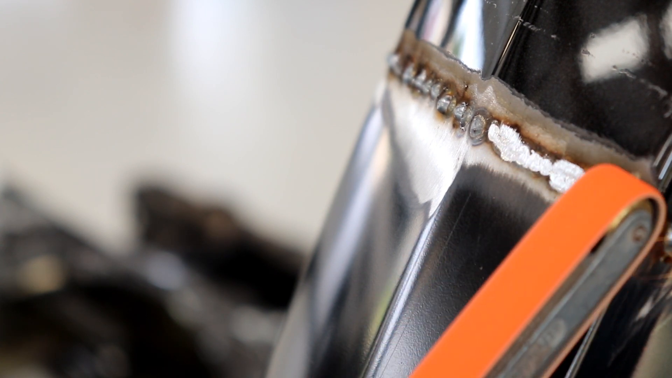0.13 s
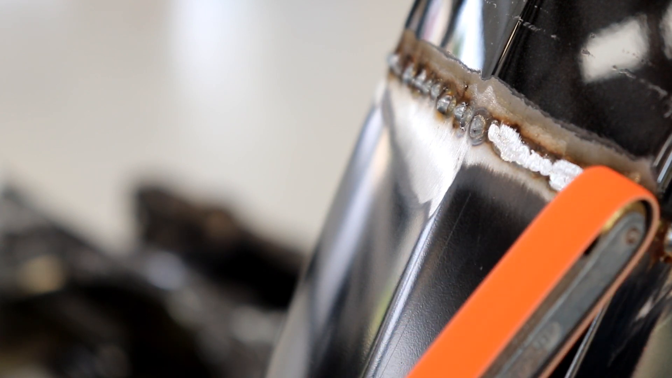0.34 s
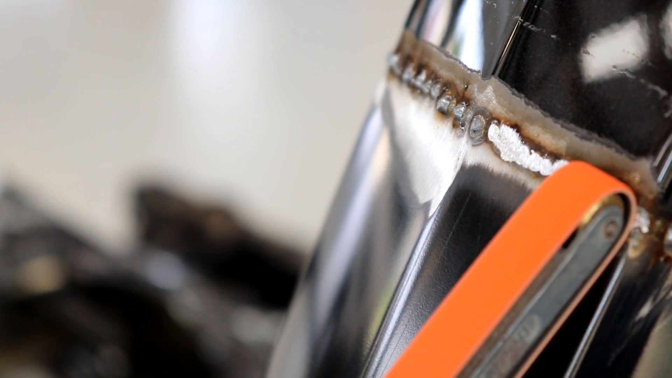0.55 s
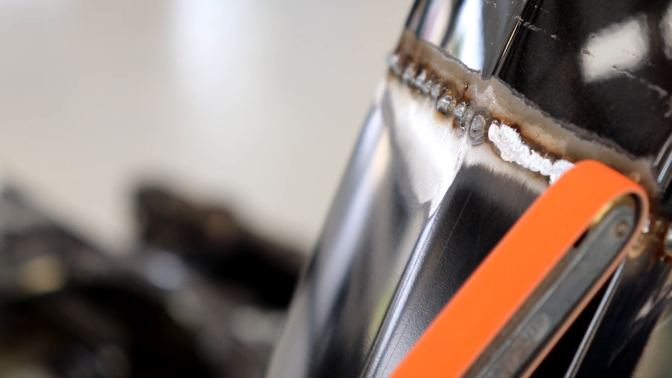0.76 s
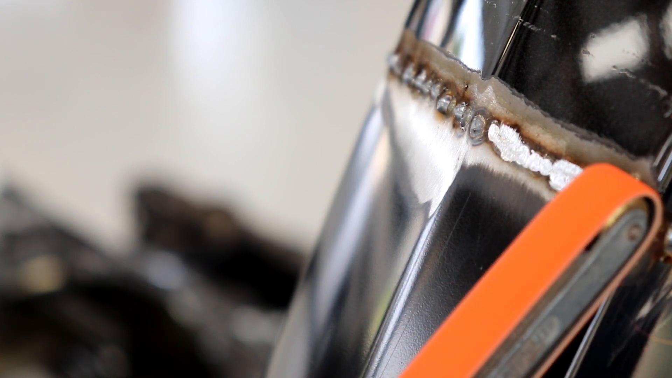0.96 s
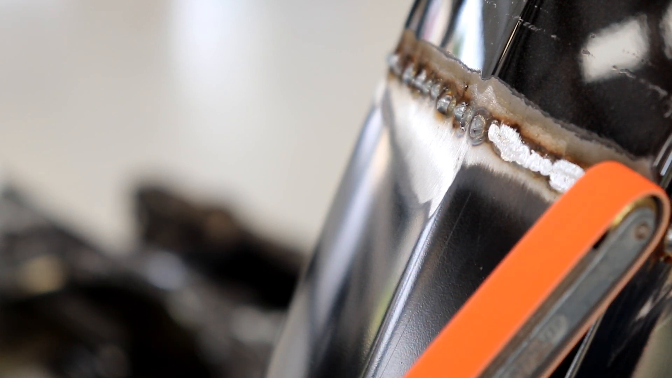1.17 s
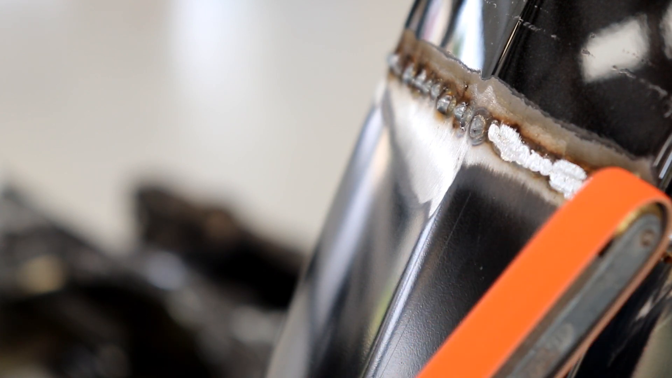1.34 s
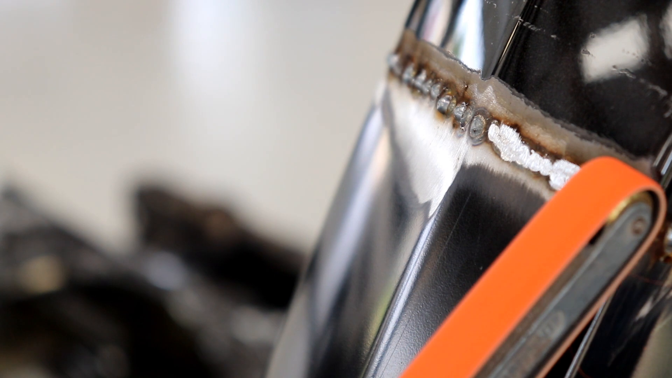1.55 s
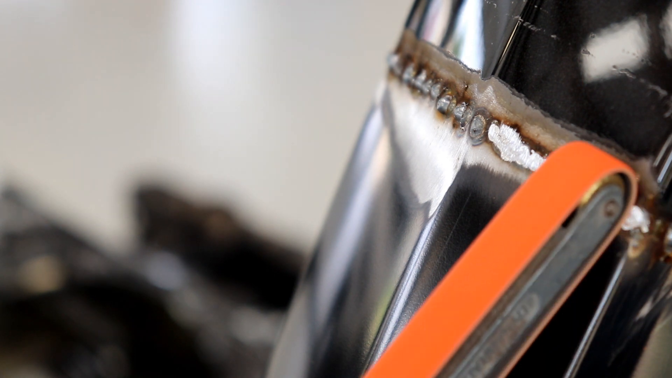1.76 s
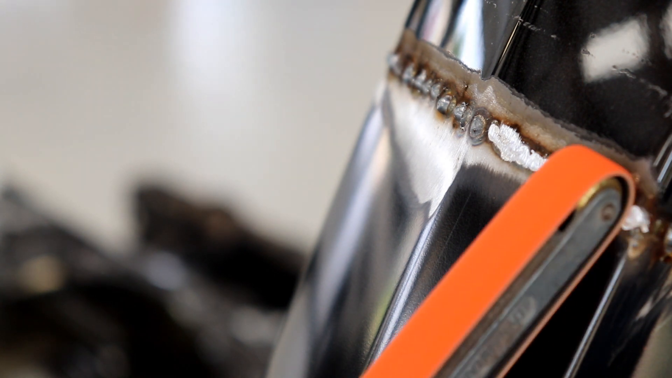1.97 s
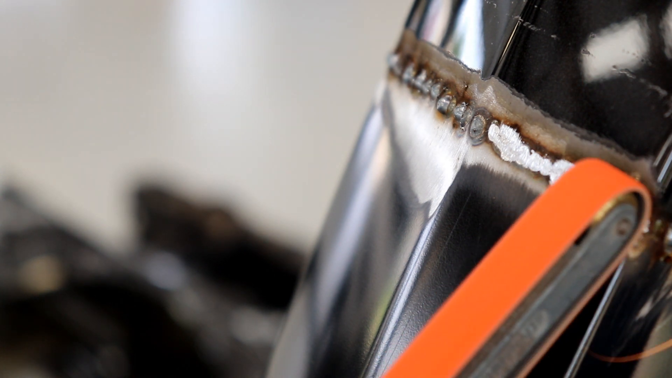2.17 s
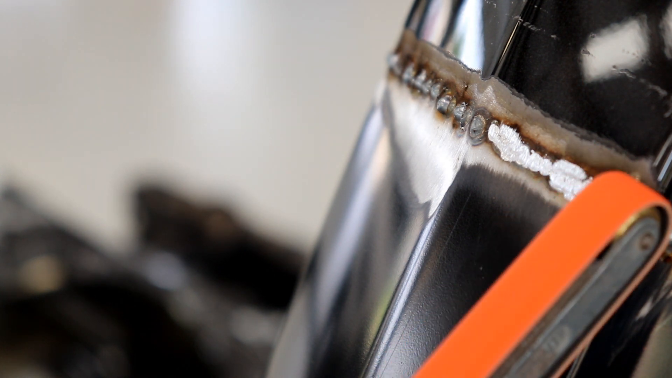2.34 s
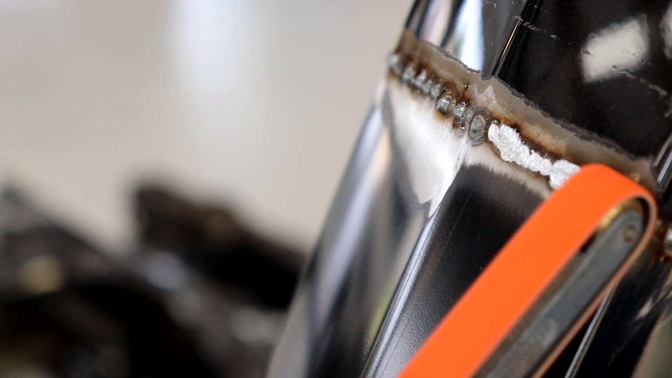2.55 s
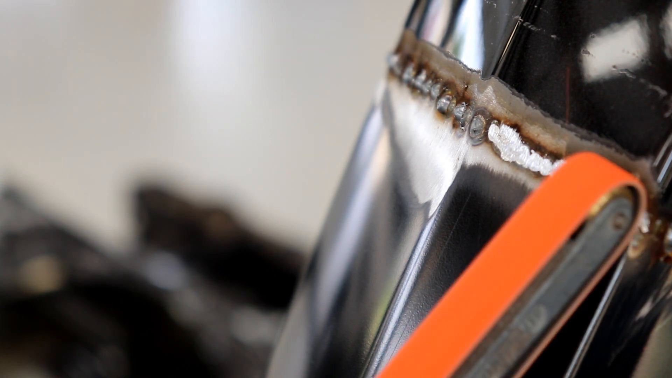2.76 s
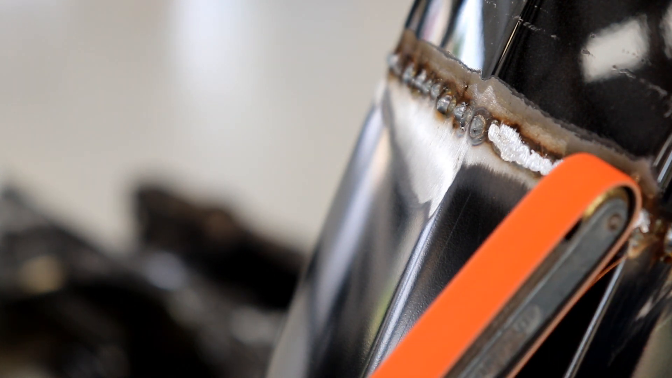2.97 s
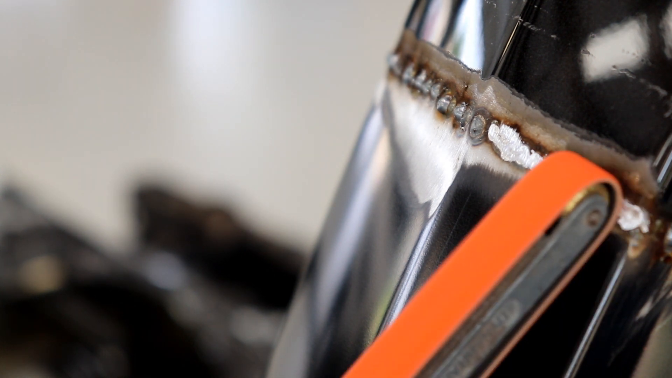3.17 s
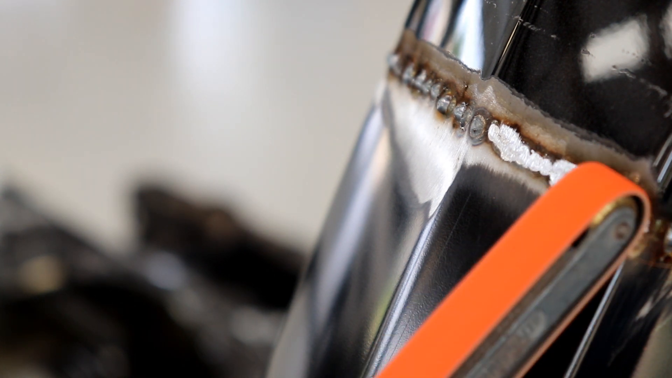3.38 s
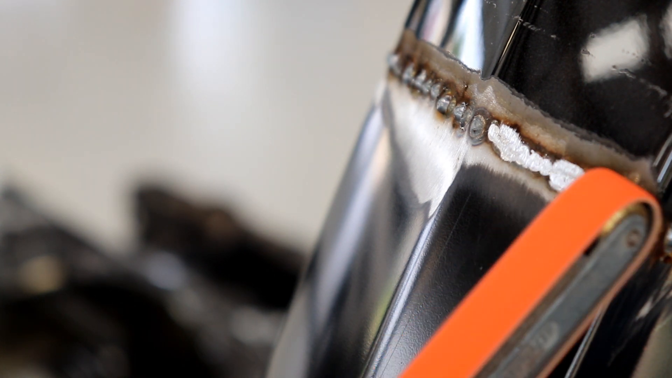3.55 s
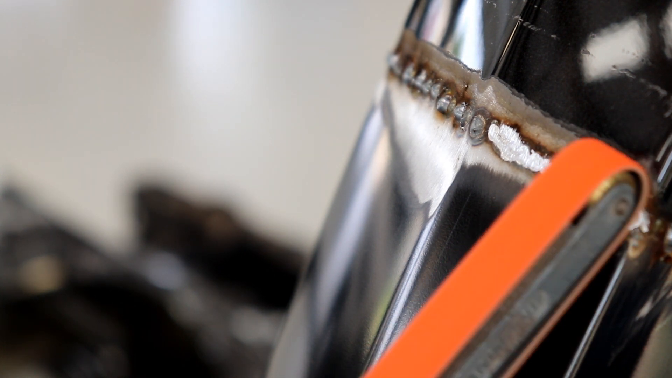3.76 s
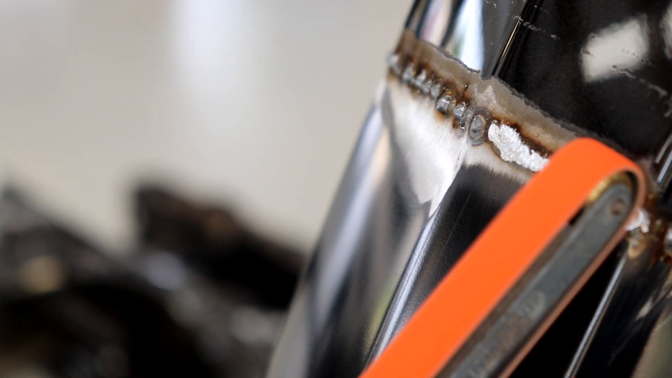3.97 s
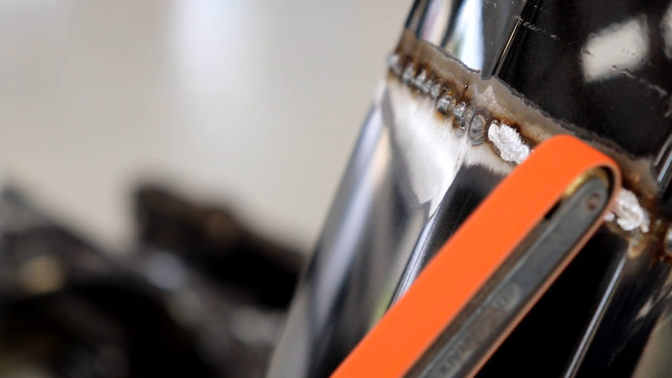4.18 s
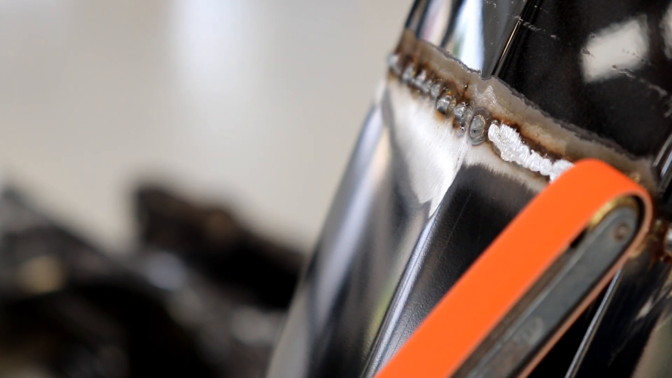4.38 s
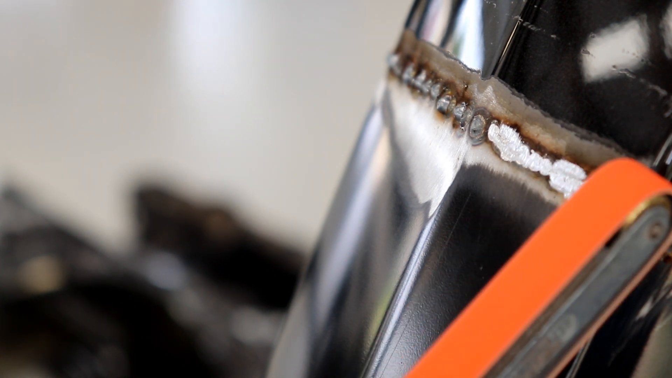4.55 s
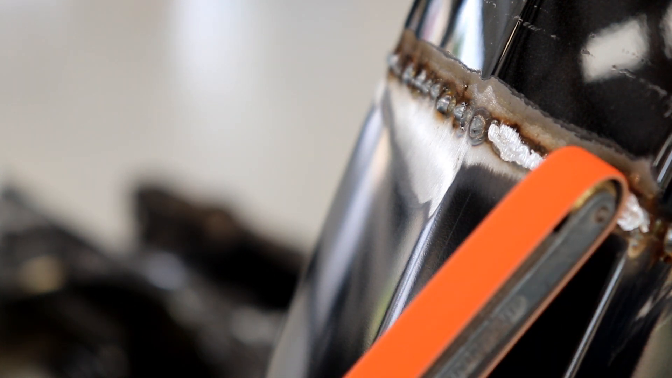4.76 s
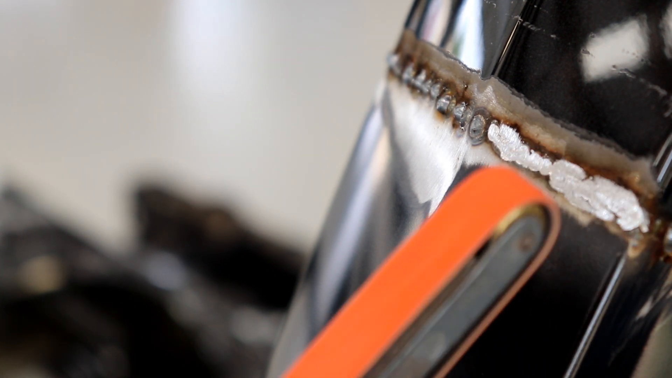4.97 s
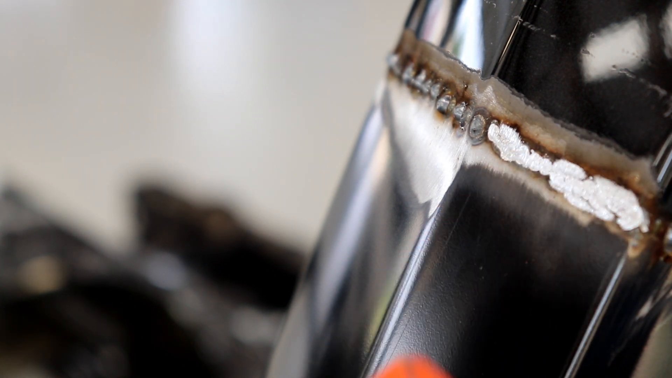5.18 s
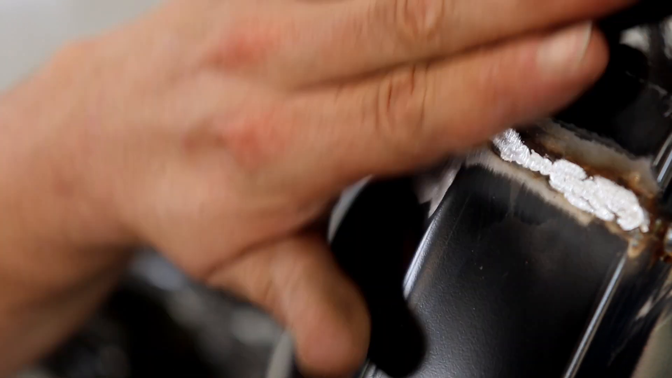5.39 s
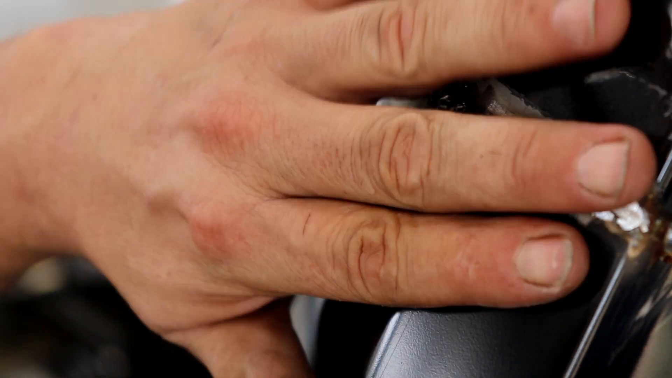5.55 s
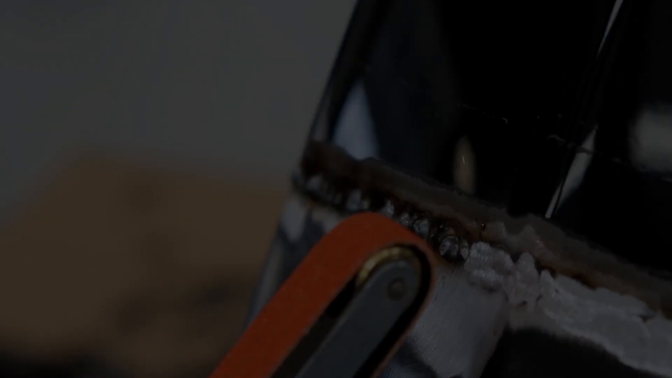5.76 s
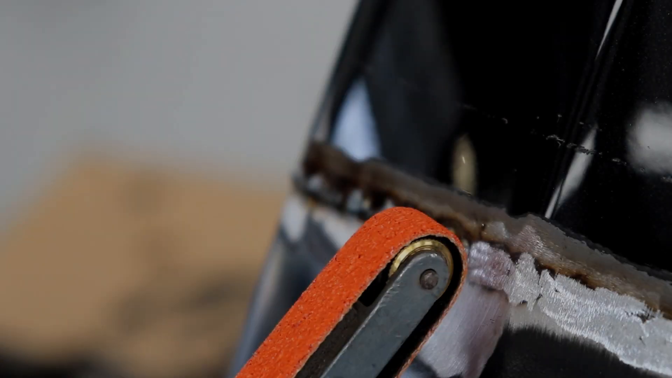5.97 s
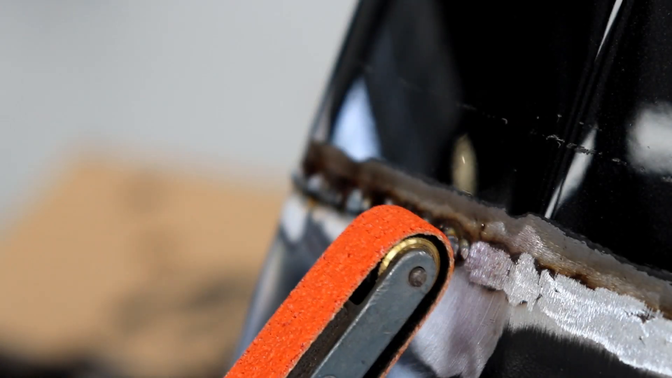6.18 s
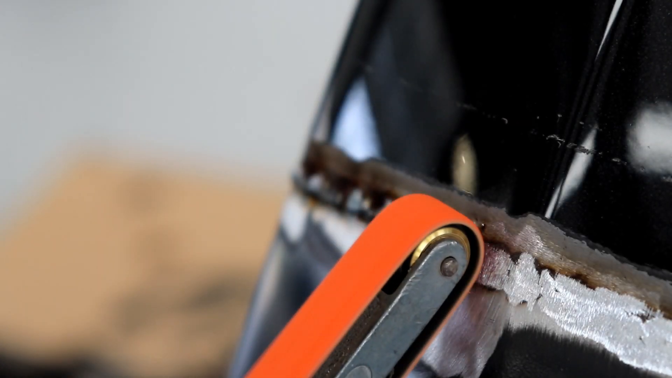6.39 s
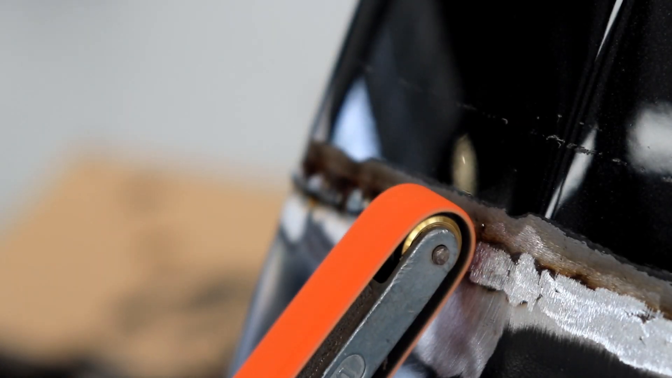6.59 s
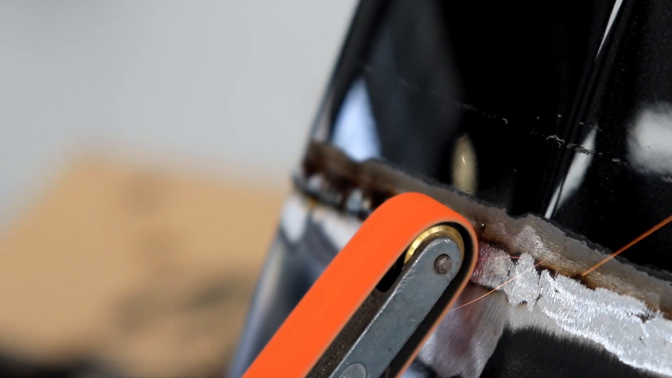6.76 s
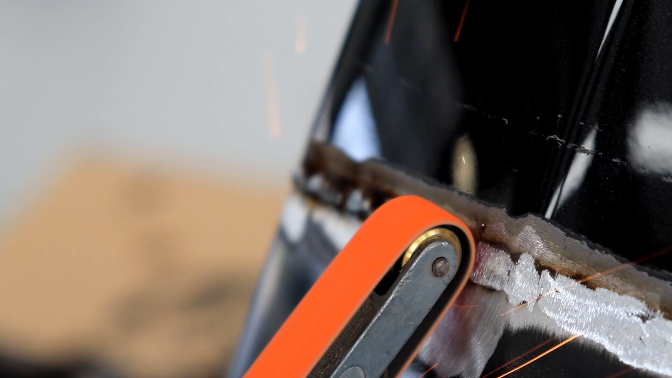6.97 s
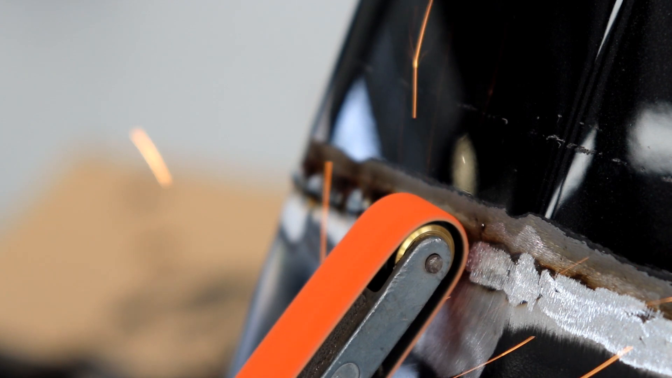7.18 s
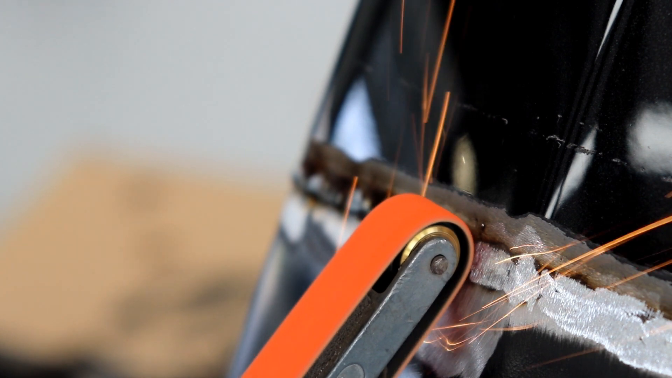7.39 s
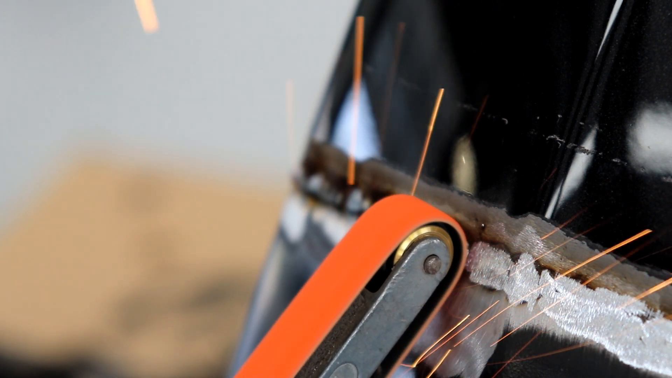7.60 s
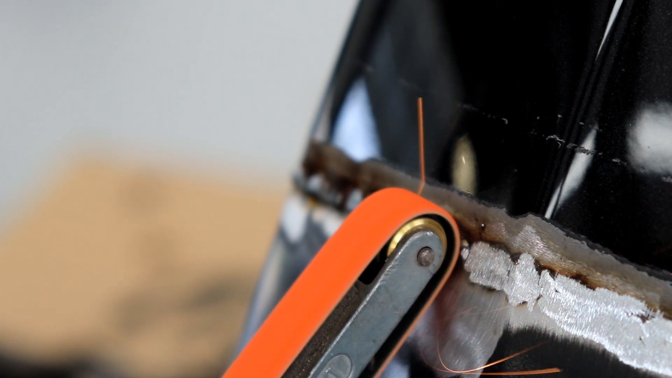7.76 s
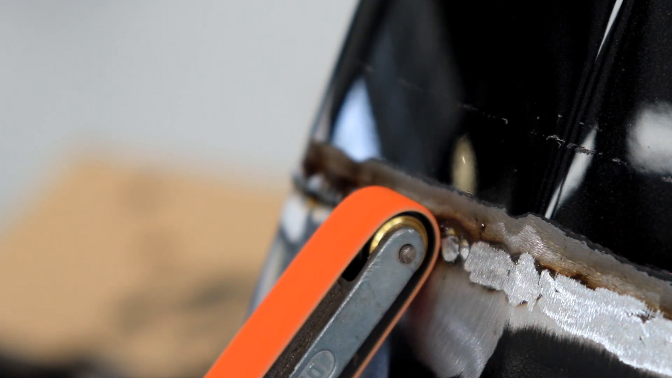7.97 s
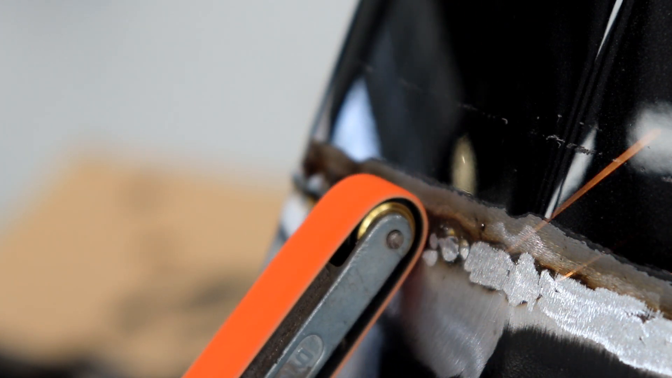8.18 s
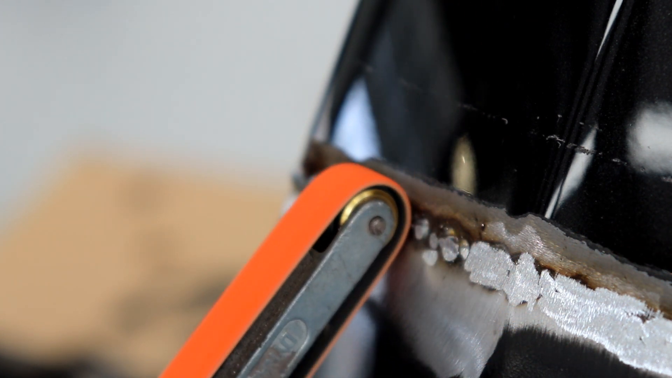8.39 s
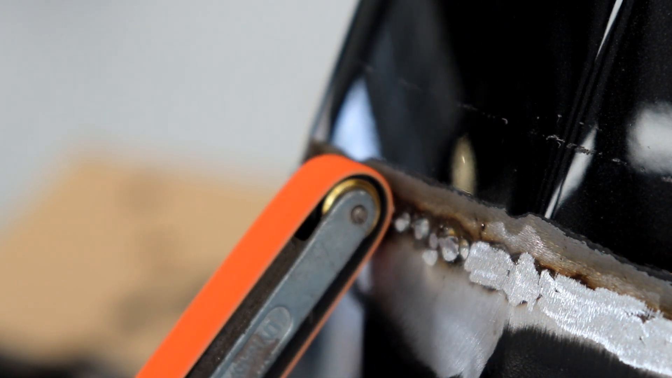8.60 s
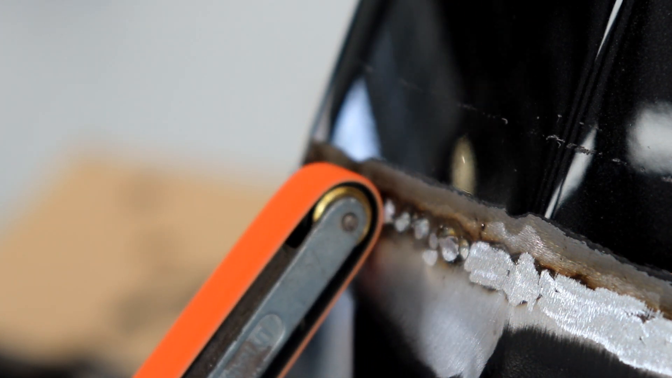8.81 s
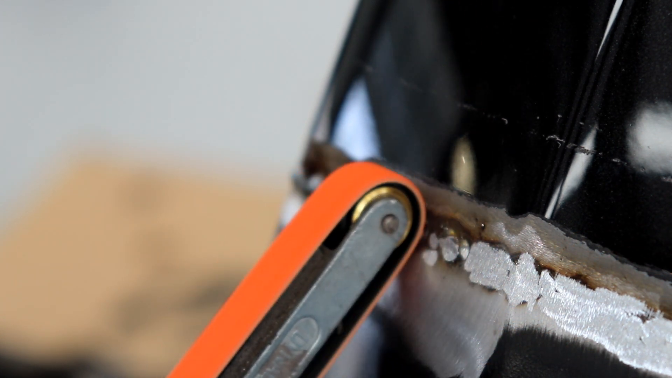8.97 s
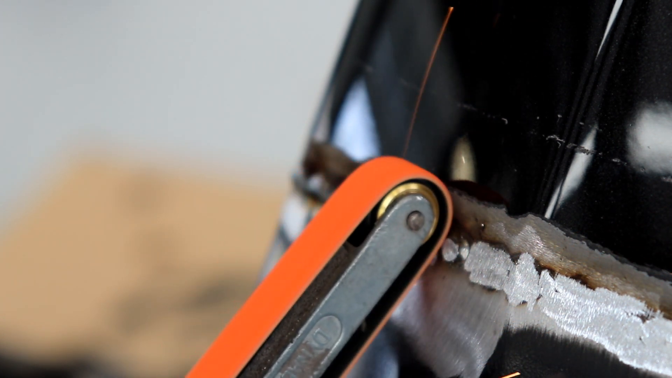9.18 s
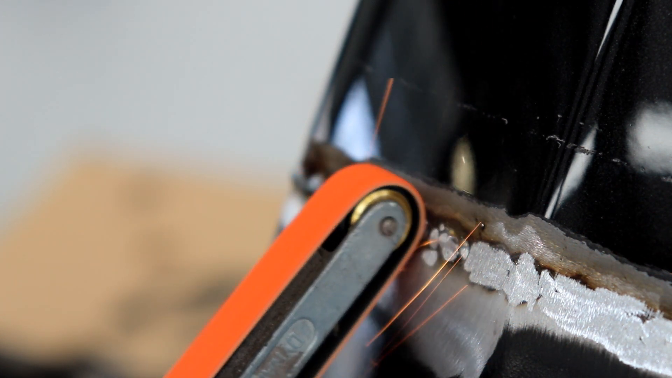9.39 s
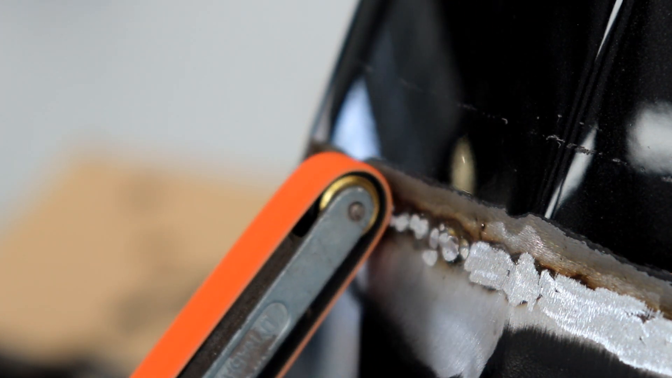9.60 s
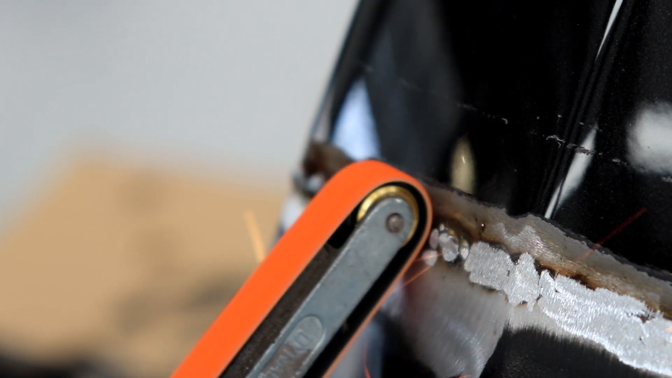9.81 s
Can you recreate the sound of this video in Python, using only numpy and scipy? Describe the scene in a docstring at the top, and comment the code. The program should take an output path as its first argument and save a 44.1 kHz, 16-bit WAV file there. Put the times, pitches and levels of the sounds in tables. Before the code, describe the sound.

A handheld pneumatic sander presses a fast abrasive belt on thin welded metal: dense harsh rasp, high jet hiss, wavering whine and faint hum. After about five seconds it cuts out with a loud, swiftly falling exhaust note. In the quieter gap, hand and tool brush the panel over a distant drone, and the motor blips. Then it putters, climbs to a whistle and grinds a second spot until the end. Close mono microphone.

```python
"""In a body shop, an air-driven belt sander grinds a weld on a thin steel panel, heard close and in mono.
It lifts off and coasts down, gives one short kick, then spins up and bites in again at a second spot.
Grit noise repeating with the belt laps drives the panel; whines and hum are multiples of the drive speed.
Exhaust pulses are sums of harmonics that fall to a putter at each stop and climb again on the restart.
Air jet, leak, scuffs and the drone of the shop are noise shaped in spectrum and level."""
import sys
import numpy as np
from scipy import signal
from scipy.fft import rfft, irfft, next_fast_len
from scipy.io import wavfile
from scipy.ndimage import uniform_filter1d

SR = 44100
rng = np.random.default_rng(int(sys.argv[2]) if len(sys.argv) > 2 else 0)


def persist_wave(psi):
    """Save psi, clipped to +-1, as 16-bit WAV."""
    counts = np.round(np.clip(psi, -1, 1) * 32767).astype(np.int16)
    wavfile.write(sys.argv[1], SR, np.atleast_2d(counts).T)


N = 433926
TIME = np.arange(N) / SR  # s

# Mean drive speed in the two passes, sagging as the belt is pressed on: t/s, speed/(turns/s)
DRIVE_SPEED_1 = [(0.0, 288.0), (0.18, 287.8), (0.34, 279.1), (0.78, 285.3), (1.34, 281.7), (1.7, 286.6),
                 (1.8, 283.1), (2.28, 287.5), (2.48, 283.9), (2.9, 286.9), (3.04, 284.2), (3.24, 287.2),
                 (3.8, 289.1), (4.26, 287.1), (4.42, 297.2), (4.76, 297.4), (4.82, 291.7), (4.9, 295.1)]
DRIVE_SPEED_2 = [(6.84, 270.8), (7.08, 274.1), (7.2, 285.4), (7.3, 287.9), (7.76, 280.6), (8.26, 293.9),
                 (8.4, 290.6), (8.98, 289.6), (9.12, 285.7), (9.62, 282.9), (9.82, 284.1)]
WORKING_SPEED, SPEED_SWING = 285, 13  # turns/s
PULSES_PER_TURN, LAPS_PER_TURN = 4.36, .154  # exhaust pulses and belt laps

# Relative spectrum of the rasp at each spot: f/Hz, level/dB
RASP_SPECTRUM_1 = [(60, -39), (150, -32), (300, -16.5), (520, -10.5), (850, 0.5), (1150, -5), (1850, -6),
                   (2150, -4.5), (2500, 3), (2950, 1), (3300, -2), (4000, -0.5), (5200, -2), (9000, -19.5)]
RASP_SPECTRUM_2 = [(60, -29), (200, -41), (300, -14.5), (500, -11), (700, -2.5), (980, 0), (1200, -4),
                   (2100, -1), (2300, -1), (3000, -0.5), (3400, 2), (4100, -2.5), (5200, -2.5),
                   (9000, -15.5)]
# Relative spectrum of the air jet in each pose: f/Hz, level/dB
JET_SPECTRUM_1 = [(2500, -25.5), (4300, -12), (5300, 4), (6100, 0.5), (6500, -4), (7200, -1), (8800, 1.5),
                  (9800, -0.5), (10500, -6.5), (11200, -2), (12400, -6), (14200, -3), (14700, -7.5),
                  (16000, -14)]
JET_SPECTRUM_2 = [(2500, -38), (4300, -13), (5300, 3), (6300, -4), (7000, 1), (7600, 1), (8700, 5),
                  (9800, 2.5), (10300, -4), (12000, -3), (14000, -5), (16000, -2)]

# Whines as multiples of drive speed: the exhaust beat, then four gear-like tones
WHINE_ORDERS = [4.36, 6, 12, 18, 30]
# The five whines in each pass: mean level at working speed/dB, slope/(dB per turn/s), flutter (0-1)
WHINES_1 = [(-35.3, -0.06, 0.24), (-34.5, -0.3, 0.4), (-36.5, -0.03, 0.3), (-26, 0.34, 0.18),
            (-38, -0.1, .2)]
WHINES_2 = [(-33.5, 0.054, .22), (-31.5, -0.052, 0.23), (-28, -0.022, 0.61), (-31.5, .4, 0.31),
            (-32.5, 0.15, 0.29)]
# Weak tones of bearings and belt rollers:
# multiple of drive speed, relative level in first pass/dB, relative level in second pass/dB
BEARING_TONES = [(1.06, -60, -46.5), (2.0, -47, -50), (2.44, -50, -44), (3.33, -49, -40), (3.52, -42, -41),
                 (3.73, -41, -42), (4.0, -44, -60), (4.98, -41, -40), (5.36, -43, -44), (6.94, -47, -40),
                 (7.25, -60, -40), (7.41, -48, -39), (7.55, -51, -41), (7.7, -47, -42), (8.0, -37, -48),
                 (8.09, -38, -49), (8.36, -40, -40), (8.72, -37, -35), (9.0, -41, -52), (9.34, -37, -38),
                 (9.72, -39, -40), (10.88, -48, -42), (11.02, -47, -42), (13.0, -44, -50),
                 (13.14, -60, -40), (13.44, -60, -40), (14.0, -45, -48), (14.8, -49, -44), (15.1, -56, -42),
                 (17.0, -42, -48), (20.0, -40, -60), (24.0, -34, -42), (25.0, -48, -44), (26.0, -45, -52),
                 (28.0, -42, -47), (32.0, -44, -48), (36.0, -49, -47)]

HUM_ORDER = 1.387  # belt hum as a multiple of drive speed
# Relative level of the belt hum in the two passes: t/s, level/dB
HUM_LEVEL_1 = [(0.0, -39), (0.11, -39), (0.38, -22.5), (0.52, -29), (0.95, -34.5), (1.0, -47), (1.06, -31),
               (1.43, -29.5), (1.49, -38), (3.02, -33), (3.11, -51), (3.14, -37), (3.73, -36.5),
               (3.77, -41), (4.3, -35), (4.49, -60), (4.75, -69), (4.78, -35), (4.83, -31), (4.9, -54)]
HUM_LEVEL_2 = [(6.7, -37.5), (7.33, -35.5), (7.46, -42.5), (7.86, -33.5), (7.91, -47), (8.15, -36),
               (8.76, -36.5), (9.56, -45.5), (9.83, -40)]
# Swells of the octave of the hum: peak t/s, half width/s, level/dB
OCTAVE_SWELLS = [(7.76, 0.13, -28.5), (9.15, 0.098, -35), (9.78, 0.13, -30)]
# Relative spectrum of the rumble that the humming belt shakes out of the panel: f/Hz, level/dB
RUMBLE_SPECTRUM = [(60, -24), (195, -17), (260, 1), (330, -3.5), (600, -25), (2000, -60)]

# Stops of the motor, on lifting off and after the short kick:
# t/s, starting speed/(turns/s), exhaust level/dB, rise/s, fall/(dB/s), treble past the muffler/dB
STOPS = [(4.92, 268, -7, 0.019, 194, 2.5), (5.7072, 90, -11.5, .002, 270, -14)]
COAST_S, FRICTION_PER_S = .082, 300  # air-drag time constant in s; turns/s lost each second to friction
# Restart: crawl in turns/s, time at which the vanes break free in s, time constant in s
CRAWL_SPEED, BREAK_FREE_S, SPIN_UP_S = 25, 6.349, .143
# Level of the exhaust pulses in the restart: t/s, level/dB
RESTART_LEVEL = [(6.328, -38), (6.365, -13.5), (6.39, -16), (6.42, -13), (6.44, -20), (6.49, -23.5),
                 (6.53, -18.5), (6.59, -20.5), (6.62, -33.5), (6.73, -25)]
# Transmission of the muffler, steeply cutting the treble: f/Hz, level/dB
MUFFLER = [(50, -28), (140, -9), (230, -2), (500, -1), (800, 0), (1000, -2), (1230, -17), (1450, -17),
           (1700, -22), (2000, -16), (2400, -30), (4000, -42)]

# The belt catches on the weld as it first bites: t/s, level/dB, rise/s, decay/s
BITES = [(6.448, -18, .008, .015)]
# The panel rings on briefly as the belt lets go: t/s, level/dB, rise/s, decay/s
RING_OUT = [(4.92, -33, .005, .06)]
# Gushes of air through the trigger valve: t/s, level/dB, rise/s, decay/s
GUSHES = [(5.707, -29, .001, 0.022), (6.327, -20.5, 0.0089, 0.18)]
# Relative spectrum of the gushes: f/Hz, level/dB
GUSH_SPECTRUM = [(80, -36), (760, -13), (1300, 7), (1490, -18), (2320, -21), (2600, -6), (3630, -7),
                 (4900, -5), (7980, -8), (8580, -5.5), (15500, -17)]
# Hand and tool slide over the panel: t/s, scuff level/dB, hiss level/dB, rise/s, decay/s
SCUFFS = [(5.13, -35, -36, .05, .1), (5.425, -35, -36, .01, 0.042), (5.595, -28, -34, 0.02, .04),
          (6.325, -19.5, -34, 0.014, 0.037)]
# Relative spectrum of the soft scuff: f/Hz, level/dB
SCUFF_SPECTRUM = [(40, -27), (200, 2), (600, 1.5), (1000, 2), (1600, -6), (3000, -23), (8000, -30)]
# Relative spectrum of escaping air, also used for the hiss of a scuff: f/Hz, level/dB
LEAK_SPECTRUM = [(880, -20), (1500, 1.5), (3150, 1.5), (3540, -2), (4390, -4), (5140, -3.5), (8880, -3),
                 (12600, -14.5), (15500, -27)]
# Relative spectrum of the shop drone: f/Hz, level/dB
SHOP_SPECTRUM = [(25, -29), (60, -15), (120, -7), (185, -7.5), (215, 0.5), (245, -4.5), (360, -9), (412, 3),
                 (470, -11), (750, -6.5), (1100, -12.5), (1600, -18), (3000, -38), (6000, -30.5)]

# The leak sounds, and the drone comes forward, in the pause
PAUSE_FROM_S, PAUSE_TO_S, SWELL_S, SINK_S = 4.94, 6.41, 0.24, 0.12
LEAK_DB, SHOP_PAUSE_DB, SHOP_WORK_DB = -40.5, -30, -51.5  # mean levels
EDGE_HZ = 15750  # upper band edge


def first_pass():
    """Superposition of load-dependent noise and drive-locked tones until the trigger is let go."""
    t = TIME[TIME < 4.93]
    speed = follow(DRIVE_SPEED_1, t)[0]
    turns = turning(t, speed, sway=.0015, jitter=.0009)
    noise = grinding(t, turns, load(speed, sag_db=0.05), RASP_SPECTRUM_1, JET_SPECTRUM_1,
                     memory=0.18, rasp_db=-22.5, jet_db=-21, chip_db=-14,
                     chatter_db=0.68, pressure_db=0.38, patchy_db=0.8)
    tones = whine(t, speed, turns, WHINES_1, np.array(BEARING_TONES)[:, :2],
                  waver_db=0.5, bearing_db=0.3, bearing_slope_db=-0.0552, bearing_flutter=0.32)
    tones += hum(t, turns, HUM_LEVEL_1, hum_db=0.4, octave_db=-55, waver_db=1.4, rumble_db=-17)
    return 0, (noise + tones) * fade(t, 0.00084, 0.021)


def second_pass():
    """Power-law growth of noise and whine with belt speed as the belt bites in again."""
    t = TIME[TIME > 6.42]
    speed = restart_speed(t)
    turns = turning(t, speed, sway=.001, jitter=.0014)
    noise = grinding(t, turns, load(speed, sag_db=0.15), RASP_SPECTRUM_2, JET_SPECTRUM_2,
                     memory=0.52, rasp_db=-20.0, jet_db=-22.0, chip_db=-14.0,
                     chatter_db=0.44, pressure_db=0.5, patchy_db=1.63)
    tones = whine(t, speed, turns, WHINES_2, np.array(BEARING_TONES)[:, ::2],
                  waver_db=1.44, bearing_db=0.16, bearing_slope_db=0.13, bearing_flutter=0.42)
    tones *= np.clip(speed / WORKING_SPEED, 0, 1) ** 5  # the whines come in as the belt takes the load
    belt_hum = hum(t, turns, HUM_LEVEL_2, hum_db=1.6, octave_db=-61, waver_db=2.0, rumble_db=-14.5)
    tones += belt_hum * fade(t, 0.18, .001)
    belt_gain = (speed / WORKING_SPEED) ** 0.42  # a slow belt cuts more quietly
    return t[0], (noise + tones) * belt_gain * fade(t, 0.025, 0.00076)


def grinding(t, turns, load_db, rasp_colour, jet_colour, memory, rasp_db, jet_db, chip_db,
             chatter_db, pressure_db, patchy_db):
    """Forced vibration: grit and chips shake the panel under jet noise, with drifting, chattering contact."""
    ticks = amp(chip_db) * chips(t, 450)
    chatter = chatter_db * (wander(t, 21.74) + wander(t, 140))
    contact_db = chatter + pressure_db * wander(t, 7.08)
    panel = shifting(coloured(grit(turns, memory) + ticks, rasp_colour), patchy_db)
    rasp = amp(rasp_db + load_db + contact_db) * panel
    gusts_db = 0.77 * contact_db + 0.42 * wander(t, 9)
    jet = coloured(rng.standard_normal(len(t)) + ticks, jet_colour)
    return rasp + amp(jet_db + gusts_db) * jet


def grit(turns, memory):
    """Cyclic excitation: noise read by belt position, each lap partly correlated with the lap before."""
    laps = turns * LAPS_PER_TURN
    memory = np.clip(memory, 0, .95)
    # one row a lap, one column a place on the belt
    belt = signal.lfilter([1], [1, -memory], rng.standard_normal(size=(300, 1024)), axis=0)
    return evened(np.take(belt, (laps * belt.shape[1]).astype(int), mode="wrap"))


def chips(t, per_s):
    """Random impulses: ticks of metal torn from the weld, up to 10 dB apart in size."""
    size = amp(10 * rng.random(len(t)) ** 2) * rng.choice([-1, 1], len(t))
    return evened(size * (rng.random(len(t)) < per_s / SR))


def shifting(x, patchy_db):
    """Modal excitation: as the contact point moves, narrow resonances of the panel come and go."""
    spectrum = signal.stft(x, nperseg=1024, noverlap=768)[2]
    patches = uniform_filter1d(rng.standard_normal(spectrum.shape), size=4, axis=0)  # over frequency
    patches = uniform_filter1d(patches, size=18, axis=1)  # over time
    gain = amp(patchy_db * evened(patches))
    return evened(signal.istft(spectrum * gain, nperseg=1024, noverlap=768)[1][:len(x)])


def load(speed, sag_db):
    """Speed-load relation: grit gains sag_db for each turn/s that pressing costs the drive, within limits."""
    return sag_db * np.clip(WORKING_SPEED - speed, -SPEED_SWING / 2, SPEED_SWING / 2)


def turning(t, speed, sway, jitter):
    """Phase as the integral of speed, which the hand sways and the uneven bite of the belt shakes."""
    return np.cumsum(speed * (1 + sway * wander(t, 10) + jitter * wander(t, 70))) / SR


def whine(t, speed, turns, whines, bearings, waver_db, bearing_db, bearing_slope_db, bearing_flutter):
    """Order-locked tones: whines whose level depends on speed, over a bed of weak bearing tones."""
    extra = np.clip(speed - WORKING_SPEED, -SPEED_SWING, SPEED_SWING)
    strong = 0
    for order, (db, slope, flutter) in zip(WHINE_ORDERS, whines):
        level_db = db + slope * extra + waver_db * wander(t, 7)
        strong = strong + amp(level_db) * tone(t, turns, order, flutter, 110)
    bed = sum(amp(db) * tone(t, turns, order, bearing_flutter, 14) for order, db in bearings)
    return strong + amp(bearing_db + bearing_slope_db * extra) * bed


def tone(t, turns, order, flutter, per_s):
    """Quadrature modulation: one multiple of drive speed flutters in strength and phase."""
    angle = 2 * np.pi * ((order * turns + rng.random()) % 1).astype(np.float32)
    in_phase = (1 + flutter * wander(t, per_s)) * np.cos(angle)
    quadrature = flutter * wander(t, per_s) * np.sin(angle)
    return (in_phase + quadrature) * np.sqrt(2 / (1 + 2 * flutter ** 2))


def hum(t, turns, level, hum_db, octave_db, waver_db, rumble_db):
    """Harmonic vibration of the belt: wavering hum with panel rumble, and an octave that swells at times."""
    strength = amp(hum_db + follow(level, t)[0] + waver_db * wander(t, 12))
    low = strength * (tone(t, turns, HUM_ORDER, 0.21, 50) + amp(rumble_db) * hiss(t, RUMBLE_SPECTRUM))
    octave = amp(octave_db) + sum(amp(db) * swell(t, s, width) for s, width, db in OCTAVE_SWELLS)
    return low + octave * tone(t, turns, 2 * HUM_ORDER, .45, 60)


def swell(t, peak_s, half_width_s):
    """Gaussian envelope: a bell-shaped rise and fall."""
    return np.exp(-((t - peak_s) / half_width_s) ** 2)


def restart_speed(t):
    """Exponential approach: the drive crawls, then its rise levels off into the second pass."""
    rise_s = DRIVE_SPEED_2[0][0] - BREAK_FREE_S
    since_free = np.clip(t - BREAK_FREE_S, 0, rise_s)
    share = np.expm1(-since_free / SPIN_UP_S) / np.expm1(-rise_s / SPIN_UP_S)
    return np.maximum(share * follow(DRIVE_SPEED_2, t)[0], CRAWL_SPEED)


def spin_up():
    """Rising pulse rate: under full air pressure the ragged putter climbs to a throbbing whistle."""
    t = np.arange(RESTART_LEVEL[0][0], RESTART_LEVEL[-1][0], 1 / SR)
    puffs = exhaust(t, restart_speed(t), edge=0.4, bypass_db=-0.5, ring=4.5, throb=0.64,
                    breath_db=-10.5, ragged_db=2.3)
    return t[0], amp(follow(RESTART_LEVEL, t)[0]) * puffs * fade(t, 0.0011, .02)


def coast(start, top_speed, db, rise_s, fall_db_per_s, bypass_db):
    """Viscous drag and dry friction: with the air cut off, the motor stops and its puffs die away."""
    t = TIME[:SR // 4]
    friction = FRICTION_PER_S * COAST_S
    speed = (top_speed + friction) * np.exp(-t / COAST_S) - friction
    t, speed = t[speed > 1], speed[speed > 1]
    puffs = exhaust(t, speed, edge=-.25, bypass_db=bypass_db, ring=0.51, throb=.05,
                    breath_db=-9.0, ragged_db=1.0)
    return start, amp(db - fall_db_per_s * t) * puffs * fade(t, rise_s, 0.076)


def exhaust(t, speed, edge, bypass_db, ring, throb, breath_db, ragged_db):
    """Fourier synthesis: vane puffs through the muffler form a whistle when fast, a putter when slow."""
    turns = np.cumsum(speed) / SR
    cycle = PULSES_PER_TURN * turns + 1 / 4
    k = np.arange(1, 25)[:, None]  # harmonic numbers
    hz = k * PULSES_PER_TURN * speed
    gain = k ** edge * amp(read(MUFFLER, hz))  # more air pressure, sharper puffs
    gain = gain * amp(bypass_db * np.clip((hz - 1000) / 300, 0, 1))  # treble that slips past the muffler
    lag = ring * (hz / 1000) ** 2  # higher harmonics lag further behind
    harmonics = gain * np.cos(2 * np.pi * k * cycle - lag)
    puffs = -harmonics.sum(0) / np.sqrt((gain ** 2).sum(0) / 2)
    spray = amp(breath_db) * hiss(t, LEAK_SPECTRUM) * np.cos(np.pi * cycle) ** 2
    # the belt joint passes two rollers a lap, harder at speed
    drag = 1 + throb * (speed / speed.max()) ** 2 * np.cos(4 * np.pi * LAPS_PER_TURN * turns)
    return (puffs + spray) * drag * amp(ragged_db * wander(t, 159.6))


def bursts(rows, colour):
    """Transient noise: each burst rises linearly and decays exponentially."""
    out = np.zeros(N)
    t = TIME[:SR // 2]
    for start, db, rise_s, decay_s in rows:
        envelope = np.minimum(t / rise_s, 1) * np.exp(-np.maximum(t - rise_s, 0) / decay_s)
        add(out, start, amp(db) * hiss(t, colour) * envelope)
    return out


def handling():
    """Sliding friction: hand and tool scuff the panel with a soft and a hissing band of noise."""
    rows = np.array(SCUFFS)
    scuff_rows = np.delete(rows, 2, axis=1)
    hiss_rows = np.delete(rows, 1, axis=1)
    return bursts(scuff_rows, SCUFF_SPECTRUM) + bursts(hiss_rows, LEAK_SPECTRUM)


def leak():
    """Turbulent flow: leaking air makes a thin hiss through the pause."""
    t = TIME[(TIME > PAUSE_FROM_S) & (TIME < PAUSE_TO_S)]
    level = amp(LEAK_DB + 0.49 * wander(t, 12.2))
    return t[0], level * hiss(t, LEAK_SPECTRUM) * fade(t, 0.0057, 0.012)


def shop():
    """Incoherent sum: distant machines blur into an uneven drone, which comes forward in the pause."""
    rising = np.clip((TIME - PAUSE_FROM_S) / SWELL_S, 0, 1)
    sinking = np.clip(1 - (TIME - PAUSE_TO_S) / SINK_S, 0, 1)
    db = SHOP_WORK_DB + (SHOP_PAUSE_DB - SHOP_WORK_DB) * rising * sinking
    return amp(db + 2.4 * wander(TIME, 25)) * hiss(TIME, SHOP_SPECTRUM)


def hiss(t, colour):
    """Filtered white noise of rms 1."""
    return coloured(rng.standard_normal(len(t)), colour)


def coloured(x, colour):
    """Linear filtering: weights the spectrum of x and sets its rms to 1."""
    size = next_fast_len(len(x))
    gain = amp(read(colour, np.fft.rfftfreq(size, 1 / SR)))
    return evened(irfft(rfft(x, size) * gain, size)[:len(x)])


def wander(t, per_s):
    """Low-rate random modulation of rms 1: straight lines between chance values, per_s of them a second."""
    knots = rng.standard_normal(4096)
    return evened(np.interp((t - t[0]) * per_s, np.arange(len(knots)), knots))


def fade(t, rise_s, fall_s):
    """Linear envelope at both ends."""
    return np.clip((t - t[0]) / rise_s, 0, 1) * np.clip((t[-1] - t) / fall_s, 0, 1)


def read(points, hz):
    """Log-frequency interpolation of a spectrum in dB."""
    f, db = np.transpose(points)
    return np.interp(np.log(hz + 1), np.log(f + 1), db)


def follow(rows, t):
    """Linear interpolation of the columns of a table at times t."""
    s, *columns = np.transpose(rows)
    return [np.interp(t, s, c) for c in columns]


def amp(db):
    """Decibel law: amplitude ratio of a level."""
    return 10 ** (np.asarray(db) / 20)


def evened(x):
    """Power normalization to rms 1."""
    return x / np.sqrt(np.mean(x ** 2) + 1e-20)


def add(mix, s, sound):
    """Superposition: adds a sound to the mix from time s."""
    part = mix[round(s * SR):][:len(sound)]
    part += sound[:len(part)]


def scene():
    """Superposition of all sources, equal in both channels."""
    mix = shop() + handling() + bursts(GUSHES, GUSH_SPECTRUM)
    mix += bursts(BITES, RASP_SPECTRUM_2) + bursts(RING_OUT, RASP_SPECTRUM_1)
    add(mix, *first_pass())
    for stop in STOPS:
        add(mix, *coast(*stop))
    add(mix, *leak())
    add(mix, *spin_up())
    add(mix, *second_pass())
    return np.array([mix, mix])


def record(dry):
    """Band limitation: a linear-phase low-pass filter cuts the sound above the band edge."""
    lowpass = signal.firwin(511, EDGE_HZ, window=("kaiser", 9), fs=SR)
    return signal.oaconvolve(dry, lowpass[None], "same")


dry = scene()
out = record(dry)
persist_wave(out)
```